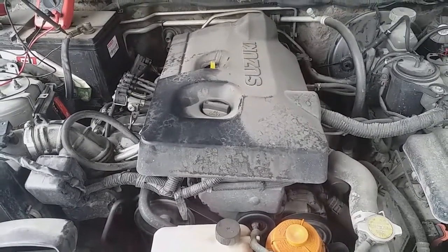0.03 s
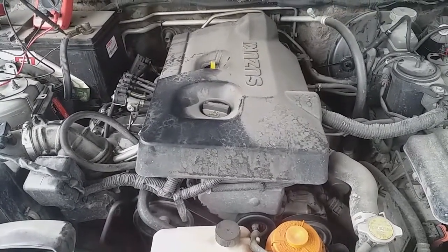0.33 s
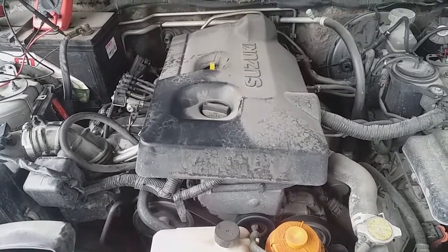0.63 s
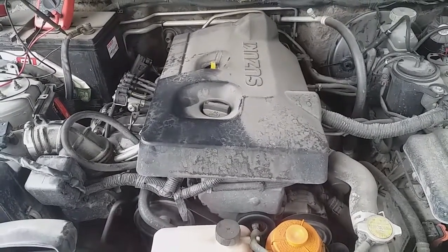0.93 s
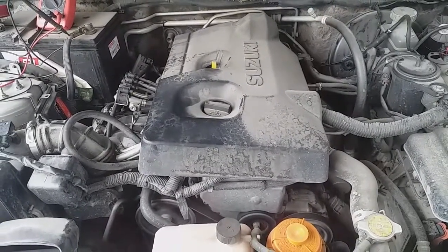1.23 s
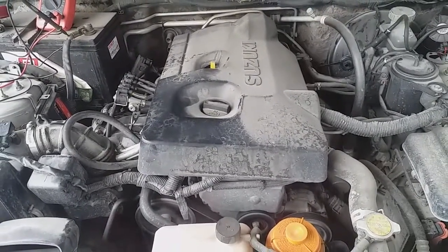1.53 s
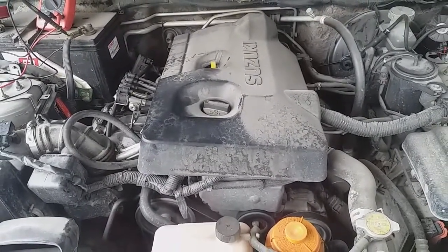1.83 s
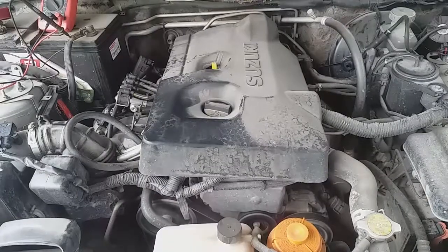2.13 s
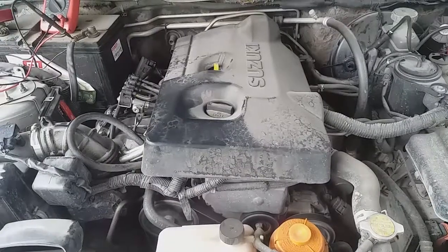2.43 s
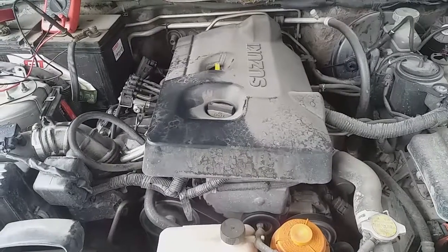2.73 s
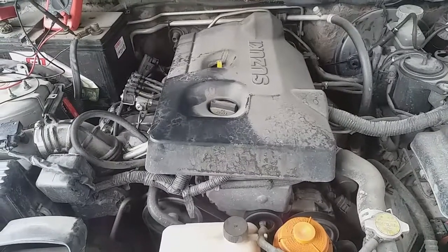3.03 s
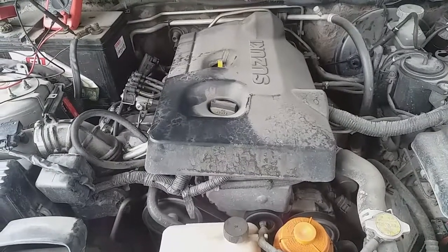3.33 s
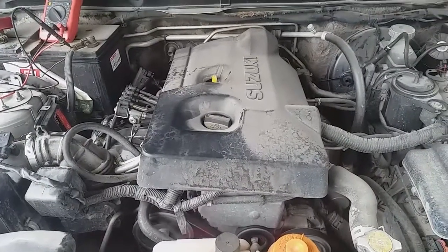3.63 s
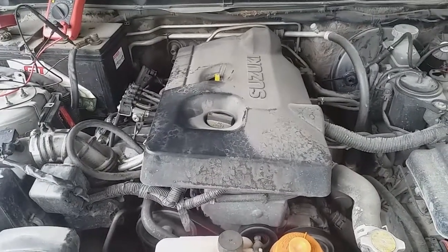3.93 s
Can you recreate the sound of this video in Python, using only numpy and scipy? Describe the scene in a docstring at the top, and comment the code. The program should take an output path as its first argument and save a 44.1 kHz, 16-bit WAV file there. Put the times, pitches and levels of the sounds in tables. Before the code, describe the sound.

Rough, surging car engine idle with clattering valves and rapid, high belt squeaks.

```python
"""A four-cylinder car engine hunting at idle, the microphone just above the open engine bay.
From the start it surges and rumbles about three times a second over a steady clatter of valves and covers.
Its firings jerk the hissing drive belt, which slips on a pulley with a rasp and a shrill chirp that rings
the bay. Loose metal knocks at half a second and three more times later on; soon after two seconds
a second pulley gives four lower squeaks."""
import sys
import numpy as np
from scipy import signal
from scipy.fft import rfft, irfft
from scipy.io import wavfile

SR = 44100
rng = np.random.default_rng(int(sys.argv[2]) if len(sys.argv) > 2 else 0)


def dump(signal):
    """Clip the signal to [-1, 1] and save it as 16-bit WAV at the path in sys.argv[1]."""
    limited = np.clip(np.atleast_2d(signal).T, -1, 1)
    pcm = np.round(limited * 32767).astype(np.int16)
    wavfile.write(sys.argv[1], SR, pcm)


N = 176400

# the engine's surging effort (time [s], relative level [dB])
ENGINE_EFFORT = [(0.0, -43), (0.02, -37.5), (0.04, -38.5), (0.1, -34.5), (0.23, -34.5), (0.32, -42),
                 (0.51, -31.5), (0.66, -40.5), (0.89, -32), (0.96, -41.5), (1.02, -39.5), (1.06, -41.5),
                 (1.17, -32.5), (1.19, -37), (1.26, -33.5), (1.34, -45), (1.48, -43.5), (1.51, -36.5),
                 (1.65, -32), (1.69, -42.5), (1.83, -33.5), (2.0, -44), (2.04, -34), (2.14, -30),
                 (2.15, -37.5), (2.32, -35), (2.41, -31), (2.55, -42.5), (2.64, -37), (2.72, -32),
                 (2.86, -39), (2.97, -40.5), (3.05, -34.5), (3.12, -37.5), (3.14, -33.5), (3.21, -42),
                 (3.3, -34), (3.54, -40.5), (3.64, -31), (3.71, -33), (3.73, -30.5), (3.8, -37.5),
                 (3.82, -36.5), (3.84, -41.5), (3.95, -33), (4.0, -32.5)]
# rumble of block and intake (frequency [Hz], relative level [dB])
RUMBLE_SPECTRUM = [(20, -30), (40, -21), (62, -6.5), (112, 0.5), (190, 1.5), (270, -0.5), (340, -5),
                   (450, -4.5), (600, -15), (1000, -12), (2500, -23)]
# steady engine drone (frequency [Hz], width of each filter pass [Hz], level [dB])
DRONE_BANDS = [(69, 16, -64.5), (119.3, 25.5, -45.5)]
# clatter of valves and covers (frequency [Hz], relative level [dB])
CLATTER_SPECTRUM = [(100, -12.5), (300, -4.5), (560, -3), (720, 1.5), (1000, -1.5), (1400, -1.5), (2000, 1),
                    (2800, -3), (3700, -4.5), (5000, -11.5), (7000, -8), (9000, -45), (15500, -26)]
# ringing covers and pulleys (frequency [Hz], width [Hz], level at mean effort [dB])
COVER_MODES = [(723, 46, -56.5), (1235.6, 23.4, -41), (1336, 54, -42), (3150, 42, -46.5), (3573, 36, -45)]
# hiss of the running belt (frequency [Hz], relative level [dB])
HISS_SPECTRUM = [(1000, 5.5), (3000, -19.5), (4300, 19.5), (5100, -14.5), (6800, 8), (8100, 8.5),
                 (9200, -6), (12000, 3.5), (15500, -7)]
# belt slips, at most one per firing, levels relative
# (middle time [s], squeal [dB], base pitch [Hz], overtones against the squeal [dB], rasp [dB])
BELT_SLIPS = [(0.003, -30.5, 4170, -14, -53), (0.047, -29.5, 4300, -25, -43),
              (0.101, -22.5, 4190, -9.5, -37.5), (0.144, -17.5, 4140, -5.5, -42),
              (0.187, -21, 4110, -5, -40), (0.231, -22.5, 4083, -7.5, -48), (0.277, -30, 4370, -22, -48),
              (0.412, -47, 4380, -14, -44), (0.462, -14.5, 4035, -10.5, -40.5),
              (0.508, -18, 4093, -7.5, -39), (0.554, -16.5, 3985, -5, -40), (0.597, -25.5, 4050, -5, -60),
              (0.647, -26.5, 4264, -14, -48), (0.693, -35, 4300, -11, -52), (0.739, -28, 4270, -15, -47.5),
              (0.785, -21.5, 4250, -10, -42), (0.838, -17.5, 4073, -7, -39), (0.88, -19.5, 4087, -6, -41),
              (0.914, -26.5, 4110, -5.5, -53), (0.963, -27.5, 4120, -14, -53),
              (1.013, -28.5, 4260, -18, -56), (1.058, -35, 4340, -13, -52), (1.106, -32.5, 4320, -10, -47),
              (1.162, -18.5, 4065, -7, -41), (1.208, -22, 4134, -4.5, -44), (1.251, -22, 4122, -6.5, -38),
              (1.292, -28.5, 4100, -4.5, -47), (1.336, -31.5, 4450, -31, -51), (1.388, -35, 4350, -17, -54),
              (1.429, -33, 4250, -14, -52), (1.478, -25.5, 4236, -13, -45.5), (1.533, -27.5, 4170, -8, -43),
              (1.589, -27, 4060, -2.5, -38.5), (1.632, -30, 4250, -14, -42.5), (1.675, -32, 4190, -16, -52),
              (1.722, -28, 4420, -22, -48.5), (1.77, -27, 4310, -14, -37), (1.82, -22.5, 4210, -7, -38),
              (1.855, -25.5, 4020, -1, -53), (1.896, -28.5, 4150, -9, -53), (1.99, -39, 4330, -27, -49.5),
              (2.036, -29.5, 4330, -22, -43), (2.088, -19, 4035, -5.5, -38),
              (2.129, -18.5, 4070, -5.5, -41), (2.17, -25.5, 4066, -5, -42), (2.213, -32.5, 4110, -14, -57),
              (2.258, -44, 4110, -3, -60), (2.344, -47, 3960, -5, -41.5), (2.384, -26, 4250, -9, -42),
              (2.428, -26, 4290, -14, -40), (2.477, -27, 4160, -4, -42.5), (2.514, -30, 4160, -21, -49),
              (2.568, -39, 4380, -12, -52), (2.657, -30, 4310, -15, -43.5), (2.707, -22.5, 4110, -2.5, -39),
              (2.754, -20.5, 4150, -3.5, -44), (2.796, -21.5, 4045, -3.5, -43), (2.837, -26, 4100, -5, -46),
              (2.883, -35, 4170, -13, -51), (2.932, -29.5, 4350, -18, -57), (2.975, -28, 4280, -14, -48),
              (3.033, -22.5, 4230, -6.5, -40), (3.082, -23.5, 4093, -3.5, -44),
              (3.126, -23.5, 4250, -8.5, -41), (3.177, -28, 4100, -5, -52), (3.217, -27, 4330, -11, -50),
              (3.268, -22, 4310, -11, -40.5), (3.316, -19, 4120, -9, -40), (3.364, -20.5, 4086, -5, -39.5),
              (3.405, -25, 4066, -4.5, -48), (3.445, -28, 4165, -8, -48), (3.494, -27, 4140, -15, -48),
              (3.585, -19, 4300, -10.5, -40.5), (3.639, -17.5, 4020, -8.5, -37),
              (3.682, -17, 4076, -6.5, -43), (3.726, -18.5, 4006, -5.5, -36), (3.768, -24.5, 4080, -7, -49),
              (3.811, -26, 4180, -19, -51), (3.902, -32, 4400, -15, -44.5), (3.952, -22, 4284, -12, -39.5),
              (3.995, -17, 4120, -6.5, -36.5)]
# rubbing of the slipping belt (frequency [Hz], relative level [dB])
RASP_SPECTRUM = [(1500, 5), (2600, -6), (3200, 7.5), (4400, 5.5), (5100, 2), (6800, 8.5), (7700, 8.5),
                 (9200, -2.5), (11000, 2.5), (13000, 3), (15500, 6.5)]
# reflections off hood and ground (delay [s], gain [dB])
BAY_REFLECTIONS = [(.0066, -10), (.013, -10)]
# peaks where the bay colours the squeal (frequency [Hz], gain [dB])
BAY_RESONANCES = [(3975, 3), (4111, -1), (4292, -16.5), (4468, 0), (4675, 1), (8138, 11.5), (8255, -2)]
# knocks of loose metal (time [s], level [dB])
METAL_KNOCKS = [(.49, -31), (1.56, -25), (2.051, -28), (3.338, -30.5)]
# ring of those knocks (frequency [Hz], relative level [dB])
KNOCK_SPECTRUM = [(200, -19), (700, 0), (1400, 3.5), (2200, -7), (4000, 0), (8000, -35)]
# squeaks of the second pulley (time [s], level [dB])
PULLEY_SQUEAKS = [(2.053, -38), (2.095, -28), (2.355, -37), (2.435, -37)]

JITTER, JITTER_PER_S = .0301, 700  # random pitch wander of both pulleys: fraction of the pitch, rate


def undb(db):
    """Decibels to gain."""
    return 10 ** (np.asarray(db) / 20)


def unit(x):
    """Scale to rms 1."""
    return x / np.sqrt(np.mean(x ** 2))


def noise():
    """White noise."""
    return rng.standard_normal(N)


def colour(x, points):
    """Shape a sound by (frequency [Hz], level [dB]) points; rms 1."""
    hz, db = np.array(points, float).T
    bins_hz = np.maximum(np.arange(N // 2 + 1) * SR / N, 1)
    gain = undb(np.interp(np.log(bins_hz), np.log(hz), db))
    return unit(irfft(rfft(x) * gain, N))


def resonate(x, hz, width):
    """One resonance, gain 1 at its centre."""
    return signal.lfilter(*signal.iirpeak(hz, hz / width, SR), x)


def walk(per_s):
    """Smooth random motion, rms 1."""
    return unit(np.interp(np.arange(N) * per_s / SR, np.arange(N), noise()))


def envelope(t, attack, hold, release):
    """Swell, hold around t = 0, fade; times in seconds."""
    return np.exp(np.minimum(t + hold / 2, 0) / attack - np.maximum(t - hold / 2, 0) / release)


def firing_cycle(t, firing_hz=22):
    """Place in the engine's firing cycle, 0 to 1; each belt slip falls on a firing."""
    slip_times = np.sort(np.array(BELT_SLIPS)[:, 0])
    firings_between = np.maximum(np.round(np.diff(slip_times) * firing_hz), 1)
    return np.interp(t, slip_times, np.r_[0, np.cumsum(firings_between)]) % 1


def engine_rumble(cycle, mean_db, surge_db):
    """Firings thump in the block over the rush of the intake; both swell with each surge, over a drone."""
    thumps = unit(np.exp(-cycle / .41) * noise())
    body = colour(noise() + undb(-5.5) * thumps, RUMBLE_SPECTRUM)
    drone = sum(undb(db) * unit(resonate(resonate(noise(), hz, width), hz, width))
                for hz, width, db in DRONE_BANDS)
    return undb(mean_db + .5 + 1.12 * surge_db) * body + drone


def valve_clatter(cycle, surge_db, ticks_per_s=500):
    """Dense small ticks of the valve gear ring the covers, harder during a surge."""
    strikes = (rng.random(N) < ticks_per_s / SR) * np.sign(noise())
    ticks = .43 * unit(strikes * undb(3 * noise()))
    drive = ticks + noise()
    covers = sum(undb(db) * unit(resonate(drive, hz, width)) for hz, width, db in COVER_MODES)
    rattle = colour(ticks + noise(), CLATTER_SPECTRUM)
    pulsing = undb(.68 * np.cos(2 * np.pi * (cycle - .1)))  # peaks just after each firing
    return pulsing * (undb(-33 + .55 * surge_db) * rattle + undb(.34 * surge_db) * covers)


def belt_hiss():
    """The running belt hisses throughout, its level wavering slightly."""
    return undb(-41.5 + 2 * walk(per_s=55)) * colour(noise(), HISS_SPECTRUM)


def belt_slips(t, flutter_hz=400, lift_hz=45, sag_hz=130, sag_s=.011):
    """Each slip on the pulley rasps and squeals on an arched, rough pitch with two steadier overtones."""
    squeal, rub = np.zeros(N), np.zeros(N)
    # the belt ribs flutter, which roughens the pitch
    flutter = np.sin(2 * np.pi * np.cumsum(flutter_hz * (1 + .22 * walk(per_s=150))) / SR)
    wobble = JITTER * walk(JITTER_PER_S) + .035 * flutter
    for at, db, hz, overtone_db, rasp_db in BELT_SLIPS:
        near = np.abs(t - at) < .07
        age = t[near] - at
        force_db = max(db + 29, 0)  # harder slips squeal longer
        hold, release = .005 + .0007 * force_db, .005 + .00022 * force_db
        spread = (.005 / hold) ** .27  # a longer slip spreads its energy
        pitch = hz + lift_hz - sag_hz * (1 - np.exp(-(age / sag_s) ** 2))  # sags on both sides
        rough_phase = 2 * np.pi * np.cumsum(pitch * (1 + wobble[near])) / SR
        steady_phase = 2 * np.pi * np.cumsum(pitch * (1 + .45 * wobble[near])) / SR
        squeal_age = age + .003  # the squeal starts before the rasp
        fundamental = np.sin(rough_phase) * envelope(squeal_age, .003, hold, release)
        overtones = undb(-3.5) * np.sin(2 * steady_phase) + undb(-10) * np.sin(3 * steady_phase)
        overtones *= envelope(squeal_age, .003, hold, release=.01)
        squeal[near] += np.sqrt(2) * spread * undb(db + .5) * (fundamental + undb(overtone_db) * overtones)
        rub[near] += undb(rasp_db + 14) * envelope(age - .0005, attack=.003, hold=.0068, release=.0067)
    shimmer = undb(1.8 * walk(per_s=400))
    return squeal * shimmer, rub * colour(noise(), RASP_SPECTRUM)


def engine_bay(squeal, t, t60_s=.12, echoes_per_s=1500):
    """The squeal reaches the microphone directly, off hood and ground, as echoes and through narrow peaks of
    the bay."""
    taps = noise() * (rng.random(N) < echoes_per_s / SR)
    taps *= undb(-60 * t / t60_s) * (t > .008)
    echoes = signal.fftconvolve(squeal, taps / np.sqrt(np.sum(taps ** 2)))[:N]
    reflected = sum(undb(db) * np.r_[np.zeros(int(lag * SR)), squeal][:N] for lag, db in BAY_REFLECTIONS)
    ring = sum(undb(db) * resonate(squeal, hz, width=52) for hz, db in BAY_RESONANCES)
    return undb(-3) * squeal + reflected + undb(-9) * echoes + ring


def metal_knocks(t):
    """Loose metal knocks, each ring dying quickly."""
    level = sum(undb(db) * envelope(t - at, attack=.001, hold=.002, release=.013)
                for at, db in METAL_KNOCKS)
    return level * colour(noise(), KNOCK_SPECTRUM)


def pulley_squeaks(t, hz=3130, half_width_s=.017):
    """A second pulley squeaks briefly on a lower, jittery pitch."""
    level = sum(undb(db) * np.exp(-((t - at) / half_width_s) ** 2) for at, db in PULLEY_SQUEAKS)
    pitch = hz * (1 + JITTER * walk(JITTER_PER_S))
    return level * unit(np.sin(2 * np.pi * np.cumsum(pitch) / SR))


def scene():
    """Engine and belt at one microphone, just above the open bay."""
    t = np.arange(N) / SR
    cycle = firing_cycle(t)
    effort_db = np.interp(t, *np.array(ENGINE_EFFORT).T)
    mean_db = np.mean(effort_db)
    surge_db = effort_db - mean_db
    squeal, rasp = belt_slips(t)
    belt = belt_hiss() + rasp
    engine = engine_rumble(cycle, mean_db, surge_db) + valve_clatter(cycle, surge_db)
    return (engine + belt + engine_bay(squeal, t) + metal_knocks(t) + pulley_squeaks(t))[None]


def record(dry, top_hz=15750):
    """The recorder cuts the top of the treble steeply."""
    return signal.sosfilt(signal.ellip(12, .2, 90, top_hz, fs=SR, output="sos"), dry)


dry = scene()
out = record(dry)
dump(out)
```